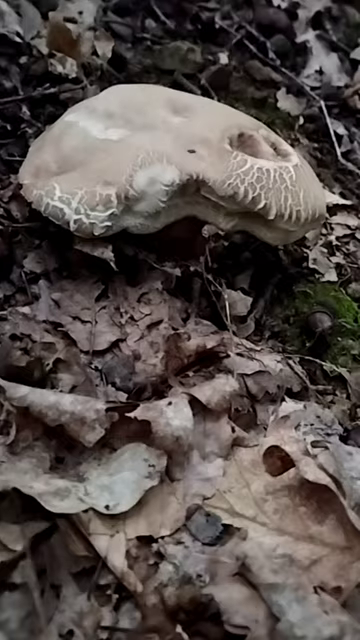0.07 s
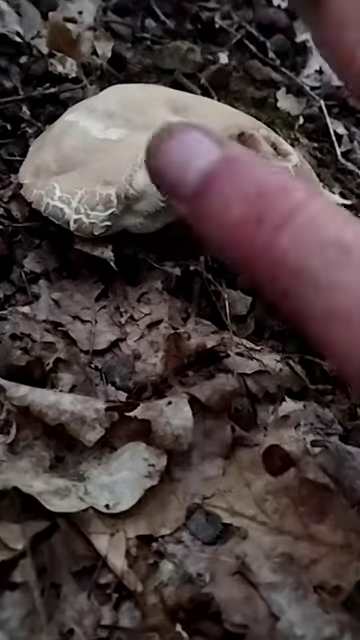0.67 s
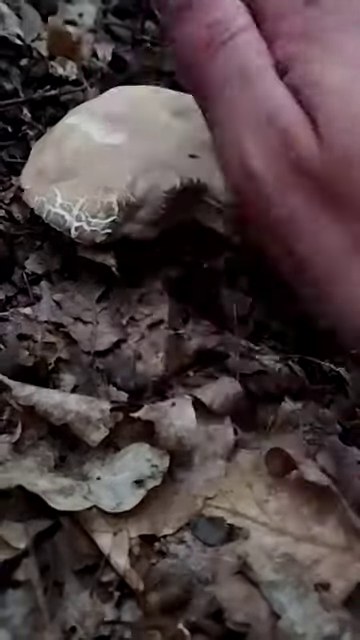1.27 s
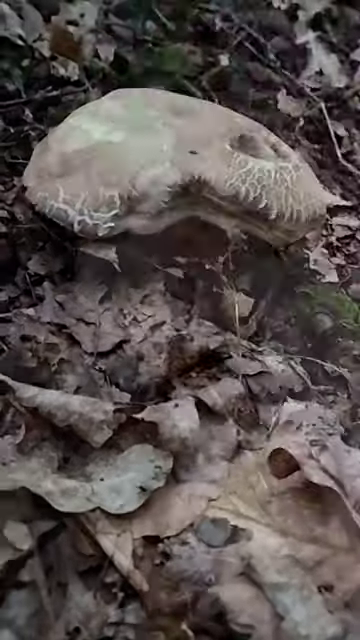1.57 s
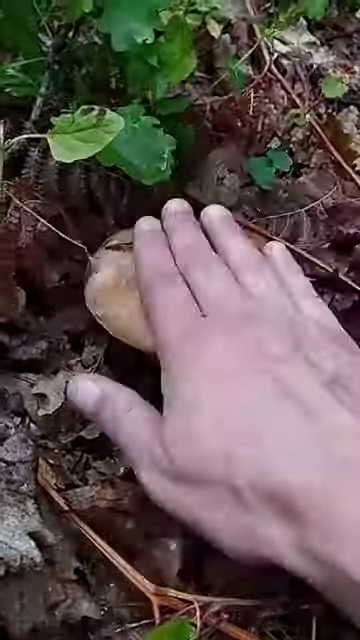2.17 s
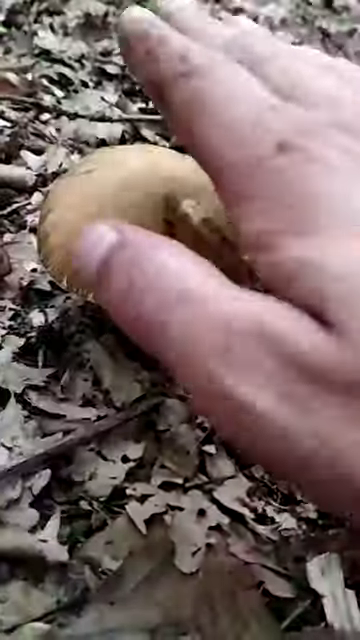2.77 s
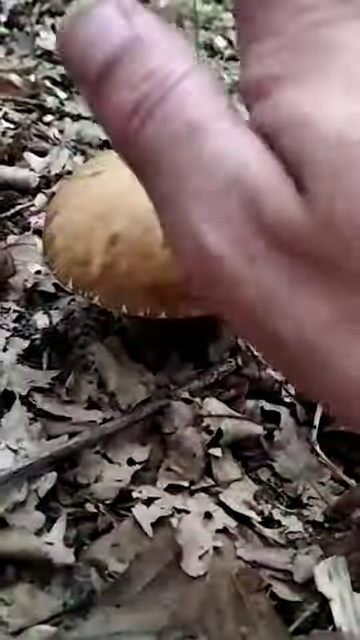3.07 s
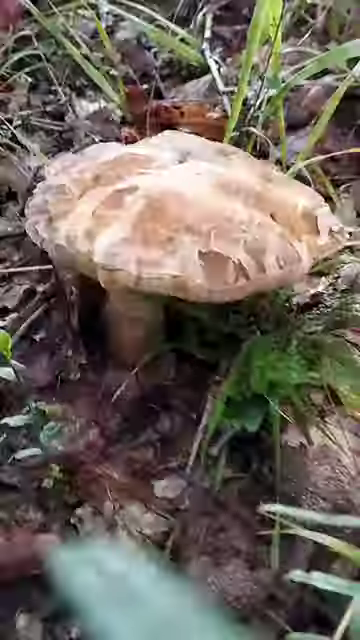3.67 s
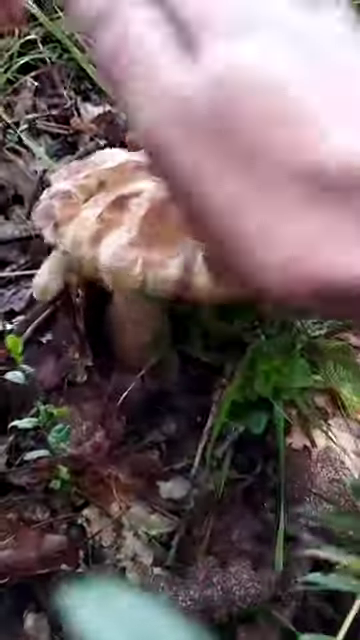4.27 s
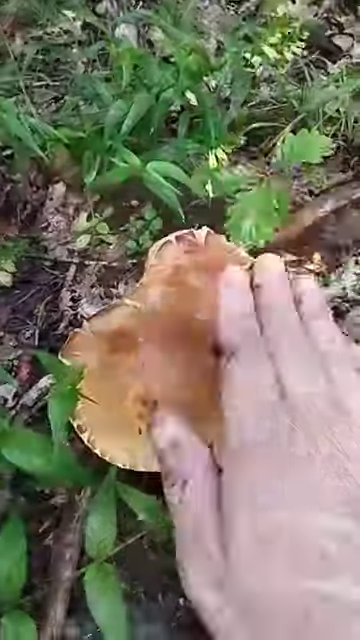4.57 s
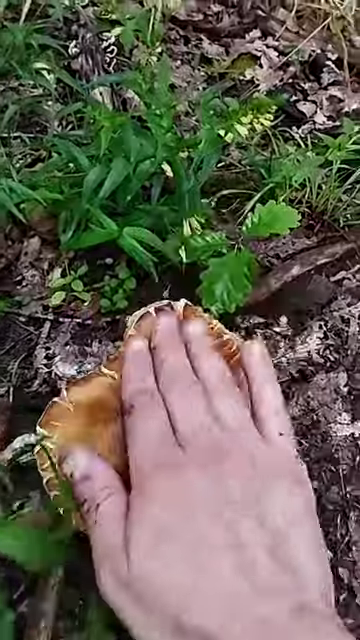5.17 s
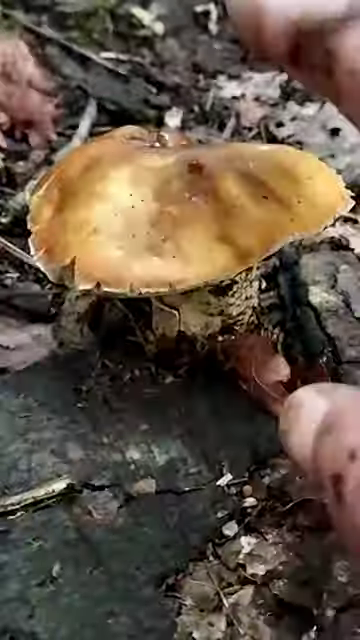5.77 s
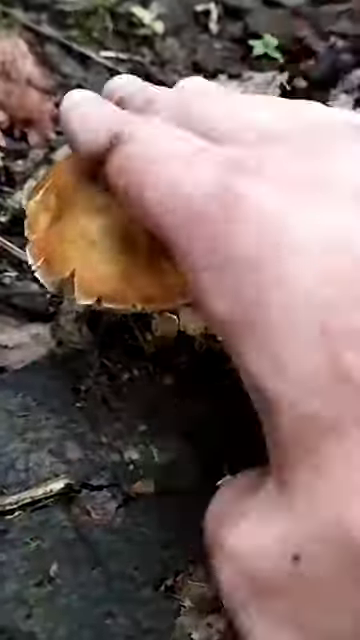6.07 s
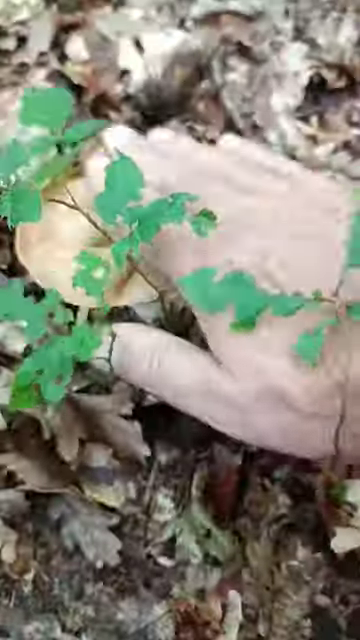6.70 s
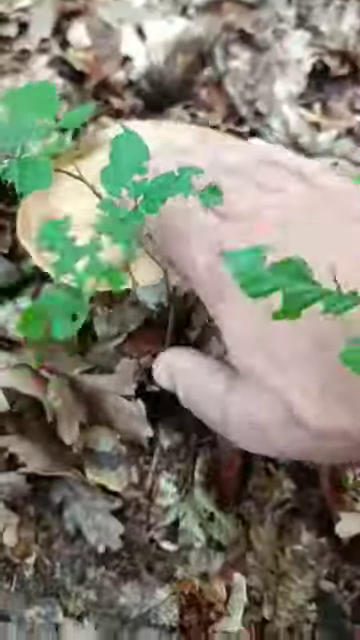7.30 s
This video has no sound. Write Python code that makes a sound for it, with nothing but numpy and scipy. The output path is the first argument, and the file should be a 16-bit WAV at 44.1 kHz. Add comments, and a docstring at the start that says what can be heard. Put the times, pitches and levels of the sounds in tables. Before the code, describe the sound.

A bare hand slaps large mushroom caps in quick sets, making short, plump smacks over faint rustling of dry leaves.

```python
"""A forest floor, phone microphones held close to seven large mushroom caps as a bare hand slaps each.
Each slap is a crack of skin, two pockets of trapped air and the short ring of the fleshy cap;
the stem passes the blow on to soil and leaves, and the trunks return a faint tail.
Dry leaves rustle nearby among short snaps and ticks, over a faint rumble of outdoor air."""
import sys
import numpy as np
from scipy import signal
from scipy.fft import rfft, irfft
from scipy.io import wavfile
from scipy.ndimage import uniform_filter1d

SR = 44100
rng = np.random.default_rng(int(sys.argv[2]) if len(sys.argv) > 2 else 0)


def master_out(mix):
    """Clip the mix to full scale and print it as 16-bit PCM to the path in sys.argv[1]."""
    frames = np.transpose(np.atleast_2d(mix))
    ceiling = np.clip(frames, -1, 1)
    pcm = np.round(ceiling * 32767).astype(np.int16)
    wavfile.write(sys.argv[1], SR, pcm)


N = 323694
T = np.arange(N) / SR
HIT_T = np.arange(8192) / SR
LAST_CAP_S = 6.58  # the leaves and the overall tone take on another colour from here

# Table levels and balances (left minus right) are those before each source's own gain and pan offset.
# The background at each cap. Each row: start in seconds, then rumble, murmur, wash, faint leaves and
# the balance of those leaves, all in dB.
SPOTS = [(0, -58.5, -63, -63.5, -64, -6), (1.55, -59.5, -55.5, -73.5, -68.5, -3),
         (2.6, -59.5, -67.5, -70.5, -72.5, -.5), (3.62, -60, -67, -70.5, -70, -0.5),
         (4.5, -59, -67, -69.5, -71.5, -4), (5.42, -59, -66, -70.5, -73.5, -3),
         (6.6, -73.5, -68.5, -75, -78, 2)]
# Spectra of the three layers of air, dry leaves, a green sprig, the forest's reflections and
# the crack of skin. Each row: frequency in Hz, level in dB.
RUMBLE = [(5, 13), (12, 7), (25, 0), (50, -4), (90, -10.5), (200, -42.5), (500, -68)]
MURMUR = [(30, -26.5), (80, 1), (140, 1), (230, -3), (350, -17), (800, -37.5)]
WASH = [(100, -20), (300, -1), (600, -8.5), (1400, -18), (2500, -10), (8000, -38)]
LEAF = [(200, -10.5), (600, 4), (1500, -3.5), (3000, -4.5), (6000, -5), (8000, -5), (16000, -5.5)]
SPRIG = [(200, -8), (700, -6.5), (1800, -3), (3000, 0.5), (4200, 3), (6500, -3.5), (8000, -7), (16000, 3)]
REFLECTIONS = [(50, -7), (150, -2.5), (450, 2), (1000, -5.5), (3000, -2.5), (12000, -9.5)]
CRACK = [(300, -20.5), (900, -7), (1600, -0.5), (2600, 6.5), (5500, 1.5), (7500, -1.5), (10000, -6.5),
         (16000, -8)]
# An arm or a foot stirs the litter. Each row: peak time in seconds, level in dB, rise and fall in
# seconds, balance in dB, swish pitch in Hz, swish height in dB.
STIRS = [(.21, -45.5, .05, 0.088, -6.5, 6350, 9), (0.494, -53, 0.023, 0.027, -6, 1500, 7),
         (.61, -60.5, .025, 0.059, -8, 5000, 0), (1.69, -55.5, .06, 0.092, -1.5, 1300, 1),
         (2.86, -67.5, .06, 0.1, -2, 6000, 8), (3.89, -69, .05, 0.078, -2, 6000, 5),
         (4.76, -70, .16, .16, -3, 1200, -1), (5.28, -69, 0.012, 0.032, 1.5, 3370, 10),
         (6.71, -69.5, .025, .025, -2, 3800, 5), (7.01, -58, 0.046, 0.048, -1.5, 3700, 7),
         (7.115, -62.5, 0.043, 0.043, 0, 5500, 8), (7.275, -48, .02, 0.021, 4, 2600, -4)]
# Short snaps and ticks nearby, including light touches just after a slap. Each row: start in seconds,
# level in dB, pitch in Hz, balance in dB, t60 in seconds.
SNAPS = [(0.175, -34, 6120, -7, .015), (.2068, -20.5, 6600, -22, .008), (0.344, -41, 6480, -6, .012),
         (.368, -42, 12000, 4, .012), (.38, -37, 9200, -8, 0.019), (.472, -32.5, 7800, 0, 0.015),
         (.509, -42, 1880, -2, 0.011), (.5888, -41, 3630, -21, 0.0097), (.684, -37, 2250, -4.5, .016),
         (.7515, -45.5, 7300, -7, 0.016), (1.0565, -44.5, 1750, -10, 0.018),
         (1.1095, -43.5, 6550, -8.5, 0.016), (1.2663, -40, 5530, -8, .025), (1.5999, -46, 2140, -1, 0.015),
         (2.4175, -52, 2400, -5, 0.017), (2.6618, -48, 13500, 13, 0.011), (2.9075, -42, 5000, 2, 0.012),
         (3.253, -54, 2000, 0, 0.023), (3.461, -48, 900, 0.5, 0.014), (3.486, -51.5, 1700, -1.5, 0.026),
         (3.86, -49, 6140, -6, .014), (3.8694, -42, 5880, -12, 0.017), (4.0345, -51, 6480, -11, 0.013),
         (4.154, -44, 6460, -19, .012), (4.5977, -46.5, 5314, -9, 0.018), (6.2094, -40, 6490, -16, 0.013),
         (7.0942, -47.5, 7600, 1, 0.028), (7.1752, -55, 7690, -2.5, .03), (7.2688, -35.5, 2600, -1.5, .02)]
# The caps in order. Each row: time to the crack's peak in seconds, crack balance in dB, shaken leaves
# in dB against the palm, thud in dB, bass cutoff in Hz, settling leaves in dB, draught in dB against
# the rumble.
CAPS = [(.0011, 3, -35, -42.5, 82, -55, 4.5), (.0023, 0.5, -32, -45.5, 93, -60, 0.5),
        (0.0016, -3.5, -46.5, -40, 74, -78, -5), (0.0013, -10, -42, -57.5, 140, -61.5, 1),
        (0.0018, -5, -50.5, -56, 120, -68, -6), (0.0016, -8.5, -40, -43.5, 85, -69.5, -8.5),
        (.0028, -1, -33, -57, 98, -68.5, -4.5)]
# Modes of the caps on their stems. Each row: cap number, pitch in Hz, t60 in seconds, level in dB
# against the palm pocket.
CAP_MODES = [ (0, 178, 0.049, -10.5), (0, 347, 0.027, -4), (0, 459, .027, -8.5), (0, 891, 0.018, -8),
             (1, 140, 0.11, -18.5), (1, 259.5, 0.09, -20), (1, 423, 0.03, -2), (1, 1337, 0.0097, 6),
             (2, 241.3, 0.035, 2.5), (2, 410, .059, -17), (2, 526, 0.029, -8.5), (2, 1089, 0.015, 5),
             (3, 190, 0.052, -17.5), (3, 245, .036, -3.5), (3, 640, .025, -15), (4, 201, 0.055, -3),
             (4, 392, 0.029, -18), (5, 189, .07, 0.9), (5, 304, 0.044, -0.5), (5, 369, .052, -2),
             (5, 510, .018, -2), (6, 141, .06, -2), (6, 265, .09, -12), (6, 399, .035, -3.5),
             (6, 665, 0.02, 2)]
# The slaps. Each row: start in seconds, cap number, palm delay in seconds; for the palm pocket and then
# the finger pocket, pitch in Hz, level in dB and cycles to peak; for the crack, level in dB,
# brightness in dB, peak pitch in Hz and peak height in dB.
SLAPS = [ (.985, 0, .0019, 276, -18, 0.28, 1200, -11, 0.35, -26, -1, 4900, 5.5),
         (1.1902, 0, .0013, 350, -8.5, 0.29, 1220, -10.5, 0.92, -27.5, -2.5, 3920, 11.5),
         (1.994, 1, 0.0000003, 369, -19, 0.65, 865, -20.5, 1.2, -31, -6, 3550, 8.5),
         (2.221, 1, .0001, 516, -16.5, .27, 886, -16.5, 1.11, -26, -2, 3530, 10),
         (3.2018, 2, 0.0025, 351, -23, 0.78, 814, -20.5, 1.32, -26, 1, 3250, 4),
         (3.4366, 2, 0, 432, -19, 0.79, 890, -10.5, .86, -25.5, -1.5, 2100, 7),
         (3.893, 3, 0.0024, 356, -13, 0.36, 940, -16.5, 0.37, -23.5, 0, 6090, 3.5),
         (4.2198, 3, 0.00091, 308, -8.5, 0.37, 616, -13, 0.46, -17, 4, 3500, 6.5),
         (4.9666, 4, 0.0007, 281.5, -9, 0.47, 700, -31, 0.78, -26, 0.5, 2300, 5),
         (5.231, 4, .0008, 282, -8, 0.48, 1760, -25, 2.2, -21.5, -3, 3350, 14),
         (6.121, 5, 0.0003, 418, -19.5, 0.95, 810, -17.5, 0.79, -24.5, 0.5, 2040, 10),
         (6.3671, 5, 0, 440, -19, 0.96, 1145, -9.5, 0.5, -19, -0.5, 6500, 4.5),
         (6.6289, 6, .0027, 302.5, -26, 0.72, 1610, -28.5, 2.26, -34, -6.5, 2580, 3),
         (6.928, 6, 0.0024, 341, -21, 0.7, 1600, -27, 1.27, -37, -0.5, 1146, 5),
         (7.223, 6, 0.0034, 486, -18, 0.62, 1397, -27.5, 2.9, -29, -8, 2180, 9)]
# Left and right tone colour, up to the last cap and then at it, where it has a thin, bright top edge.
# Each row: frequency in Hz, left gain in dB, right gain in dB.
TONE = [(100, 0, 1.5), (1200, 1, 1.5), (2780, -4, -1), (4500, 0.5, -3), (6600, -7, 2.5), (8140, -11, -8.5),
        (11065, -10, -16.5), (13600, 2.5, -9), (16000, -1.5, -12)]
LAST_TONE = [(24.7, -47, -27), (53.8, 4, 2), (99.1, -1.5, -1), (2000, 3.5, 3.5), (4370, -2.5, 0),
             (6944, 1, 5), (10290, -3, -23), (13500, -17, -11), (15230, 3, 2)]


def undb(db):
    """Decibels to gain."""
    return 10 ** (np.asarray(db) / 20)


def unit(x):
    """Scale to rms 1."""
    return x / np.sqrt(np.mean(x ** 2))


def sides(pan_db):
    """Left and right gains for a balance."""
    return undb(np.array([[pan_db], [-pan_db]]) / 2)


def pan(x, pan_db):
    """Place a sound between the microphones at constant power."""
    return x * unit(sides(pan_db))


def decay(t, t60):
    """Envelope that falls 60 dB in t60 seconds."""
    return np.exp(-np.log(1000) * t / t60)


def stereo_noise(size, apart):
    """Noise common to both microphones, plus a share that each hears alone."""
    return rng.standard_normal(size) + apart * rng.standard_normal((2, size))


def colour(x, outline, size=4096):
    """Causal, minimum-phase filter with the given (Hz, dB) outline."""
    hz, db = np.transpose(outline)
    grid = np.maximum(np.arange(size // 2 + 1) * SR / size, 1)
    gain = undb(np.interp(np.log(grid), np.log(hz), db))
    cepstrum = irfft(np.log(gain))
    cepstrum[1:size // 2] *= 2
    cepstrum[size // 2 + 1:] = 0
    response = irfft(np.exp(rfft(cepstrum))).reshape((1,) * (x.ndim - 1) + (-1,))
    return signal.oaconvolve(x, response, axes=-1)[..., :x.shape[-1]]


def low_cut(x, hz):
    """Second-order high-pass."""
    return signal.sosfilt(signal.butter(2, hz, "high", fs=SR, output="sos"), x)


def add(track, s, sound):
    """Mix a sound into the track at s seconds."""
    start = int(s * SR)
    part = sound[..., :N - start]
    track[:, start:start + part.shape[-1]] += part


def swell(s, db, rise_s, fall_s, pan_db):
    """Left and right power of one movement: it grows to its peak at s and dies away."""
    age = (T - s) / np.where(T < s, rise_s, fall_s)
    return (undb(db) * sides(pan_db)) ** 2 * np.exp(-2 * np.minimum(age ** 2, 20))


def background_levels(fade_s=0.35, dip_db=-3.5, dip_s=0.096):
    """Rumble, murmur, wash, leaves and balance in dB; the levels dip as one spot blends into the next."""
    starts, *columns = np.transpose(SPOTS)
    spot = np.searchsorted(starts[1:], T)
    *levels, pan_db = [uniform_filter1d(column[spot], int(fade_s * SR)) for column in columns]
    dips = sum(np.exp(-np.minimum(((T - s) / dip_s) ** 2, 20)) for s in starts)
    return [db + dip_db * dips for db in levels] + [pan_db]


def draught(swing_s=0.1):
    """Strength of the air that the swinging hand pushes at the microphones around each slap."""
    power = 0
    for s, cap, *_ in SLAPS:
        *_, draught_db = CAPS[cap]
        power = power + swell(s, draught_db, swing_s, swing_s, pan_db=0)
    return np.sqrt(power)


def air(rumble_gain_db=5.5):
    """Low outdoor air, partly shared by both microphones; the rumble grows as the hand swings by."""
    rumble, murmur, wash = (unit(colour(stereo_noise(N, apart=0.88), outline)) * undb(db)
                            for db, outline in zip(background_levels(), (RUMBLE, MURMUR, WASH)))
    return undb(rumble_gain_db) * rumble * (1 + draught()) + murmur + wash


def forest(x, near_t60=0.08, near_db=-21, far_t60=0.18, far_db=-39, gap_s=0.0031):
    """Ground and body scatter the sound at once; the trunks, farther off, return a much fainter tail."""
    t = np.arange(SR // 2) / SR
    response = 0
    for t60, db in ((near_t60, near_db), (far_t60, far_db)):
        tail = stereo_noise(len(t), apart=0.57) * decay(t, t60) * (t > gap_s)
        response = response + undb(db) * unit(tail) / np.sqrt(len(t))
    return x + signal.oaconvolve(x, colour(response, REFLECTIONS), axes=-1)[:, :N]


def crackle(size, per_second, spread_db):
    """Tiny fractures of dry leaves, many weak and a few strong, different at each microphone."""
    strength = undb(spread_db * np.minimum(rng.exponential(size=size), 5))
    breaks = rng.random(size) < per_second / SR
    return unit(breaks * strength * rng.standard_normal((2, size)))


def leaf_ticks(per_second=330, spread_db=3.5, t60=0.042, scatter_db=5, bands=9):
    """Single leaves tick, each briefly and in its own part of the spectrum."""
    out = 0
    t = HIT_T[:1024]
    for hz in np.geomspace(1300, 13000, bands):
        draws = rng.random((1000, 4))[:int(per_second / bands * N / SR)].T
        when, strength, each_side = draws[0], draws[1], draws[2:]
        tick_db = spread_db * np.minimum(-np.log(1 - strength), 4) + scatter_db * (2 * each_side - 1)
        ticks = np.zeros((2, N))
        ticks[:, (when * N).astype(int)] = undb(tick_db)
        outline = [(hz / 6, -32), (hz / 1.5, -12), (hz, 0), (hz * 1.3, -12), (hz * 3, -20)]
        ring = unit(colour(rng.standard_normal((2, len(t))) * decay(t, t60), outline))
        out = out + np.sqrt(hz) * signal.oaconvolve(ticks, ring, axes=-1)[:, :N]
    return unit(out)


def stirring(leaves):
    """Each stir swishes at its own pitch; the litter gives under every slap and settles again."""
    swishes, settling_power = 0, 0
    for s, db, rise_s, fall_s, pan_db, hz, height_db in STIRS:
        swish = colour(leaves, [(hz / 1.24, 0), (hz, height_db), (hz * 1.36, 0)])
        swishes += swish * np.sqrt(swell(s, db, rise_s, fall_s, pan_db))
    for s, cap, *_ in SLAPS:
        *_, settle_db, _ = CAPS[cap]
        settling_power += swell(s, settle_db, rise_s=0.053, fall_s=0.12, pan_db=-2)
    return swishes + leaves * np.sqrt(settling_power)


def rustle(near_ticks_db=5, far_ticks_db=-4, hiss_db=-4, gain_db=2):
    """Leaves near and far hiss as they slide and crackle as they bend; a green sprig at the last cap."""
    *_, far_db, pan_db = background_levels()
    ticks = leaf_ticks()
    near = crackle(N, per_second=2600, spread_db=2) + undb(near_ticks_db) * ticks
    near += undb(hiss_db) * rng.standard_normal((2, N))
    far = rng.standard_normal((2, N)) + undb(far_ticks_db) * ticks
    near, far = (np.where(T < LAST_CAP_S, unit(colour(x, LEAF)), unit(colour(x, SPRIG)))
                 for x in (near, far))
    far *= undb(far_db + np.array([pan_db, -pan_db]) / 2)
    return undb(gain_db) * (stirring(near) + far)


def snaps(rise_s=0.0004, skirt_db=-9, gain_db=3, pan_offset_db=3):
    """Snaps and ticks nearby, and light touches just after a slap: short bursts, each at its own pitch."""
    out = np.zeros((2, N))
    for s, db, hz, pan_db, t60 in SNAPS:
        envelope = decay(HIT_T, t60) * (1 - np.exp(-HIT_T / rise_s))
        outline = [(hz / 20, 3 * skirt_db), (hz / 2, skirt_db), (hz, 0), (hz * 2, skirt_db)]
        burst = unit(colour(rng.standard_normal((2, len(HIT_T))), outline))
        add(out, s, pan(undb(db + gain_db) * envelope * burst, pan_db + pan_offset_db))
    return out


def shaken_leaves(t60=0.16, gain_db=8):
    """The stem passes the blow to the litter around its foot."""
    grains = unit(colour(crackle(len(HIT_T), per_second=5000, spread_db=1), LEAF))
    return undb(gain_db) * grains * decay(HIT_T, t60)


def ground_thud(gain_db=2):
    """The stem pushes into the soft soil, which answers with a slow, deep bump."""
    return pocket(HIT_T, hz=62, db=gain_db, cycles=0.71)


def pocket(t, hz, db, cycles):
    """Air trapped under the hand swells and dies within a few cycles, starting with a suction."""
    age = t * hz / cycles
    return -undb(db) * age * np.exp(1 - age) * np.sin(2 * np.pi * hz * t)


def cap_ring(t, cap, push_s=0.0016):
    """The soft push of the palm sets the damp flesh of the cap ringing."""
    modes = [undb(db) * np.sin(2 * np.pi * hz * t) * decay(t, t60)
             for number, hz, t60, db in CAP_MODES if number == cap]
    return -sum(modes) * (1 - np.exp(-t / push_s))


def crack(crest_s, bright_db, peak_hz, peak_db, width=1.25, sharpness=2.2, uneven_db=4, span_s=0.0033):
    """Skin meets the cap in a run of tiny, uneven contacts; the closing gap favours one pitch."""
    age = HIT_T / crest_s
    contacts = stereo_noise(len(age), apart=0.86) * undb(uneven_db * rng.standard_normal(len(age)))
    burst = colour(contacts * (age * np.exp(1 - age)) ** sharpness, CRACK)
    burst = colour(burst, [(2800, 0), (5500, bright_db)])
    burst = colour(burst, [(peak_hz / width, 0), (peak_hz, peak_db), (peak_hz * width, 0)])
    energy = np.mean(np.sum(burst ** 2, axis=-1))
    return burst * np.sqrt(span_s * SR / energy)  # as much energy as span_s of sound at rms 1


def slaps(palm_pan_db=2.5, finger_pan_share=0.15, crack_pan_offset_db=0.5):
    """Close to the microphones the fingers land; the palm, with or just after them, drives the cap."""
    out = np.zeros((2, N))
    for (s, cap, delay_s, palm_hz, palm_db, palm_cycles, finger_hz, finger_db, finger_cycles,
         crack_db, bright_db, peak_hz, peak_db) in SLAPS:
        crest_s, pan_db, leaves_db, thud_db, cutoff_hz, _, _ = CAPS[cap]
        palm_t = np.maximum(HIT_T - delay_s, 0)
        fingers = pocket(HIT_T, finger_hz, finger_db, finger_cycles)
        palm = pocket(palm_t, palm_hz, palm_db, palm_cycles) + undb(palm_db) * cap_ring(palm_t, cap)
        skin = undb(crack_db) * crack(crest_s, bright_db, peak_hz, peak_db)
        # the hand shades high sounds more than low ones, and so small a source radiates little bass
        body = pan(palm, palm_pan_db) + pan(fingers, finger_pan_share * pan_db)
        add(out, s, low_cut(body, cutoff_hz))
        add(out, s, pan(skin, pan_db + crack_pan_offset_db))
        add(out, s, undb(palm_db + leaves_db) * shaken_leaves() + undb(thud_db) * ground_thud())
    return out


def scene():
    """Close slaps and snaps in the open forest, over rustle and air."""
    return forest(slaps() + snaps()) + rustle() + air()


def record(dry):
    """Left and right each have their own tone colour; the phone starts a moment late and cuts the top."""
    start_s, right_lag_samples, top_hz = 0.06, 7, 16000
    first, last = (np.array([colour(dry[ch], np.array(tone)[:, [0, ch + 1]]) for ch in range(2)])
                   for tone in (TONE, LAST_TONE))
    left, right = np.where(T < LAST_CAP_S, first, last) * (T > start_s)
    heard = np.array([left, np.pad(right, (right_lag_samples, 0))[:N]])
    return signal.sosfilt(signal.ellip(8, 0.2, 70, top_hz, fs=SR, output="sos"), heard)


dry = scene()
out = record(dry)
master_out(out)
```